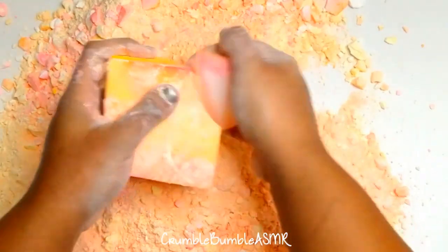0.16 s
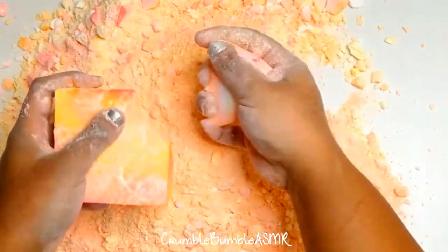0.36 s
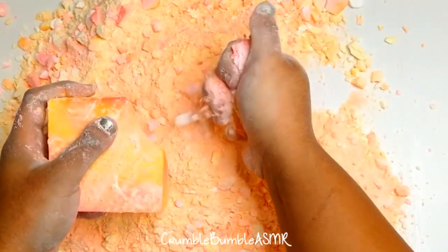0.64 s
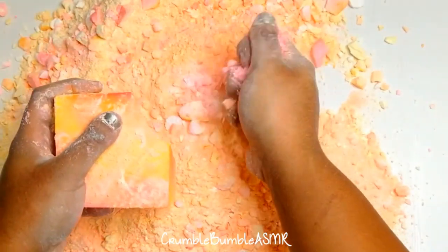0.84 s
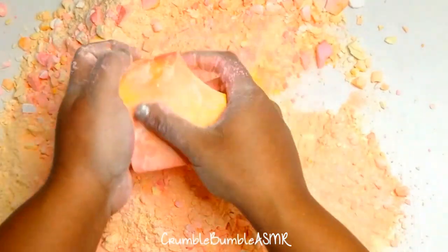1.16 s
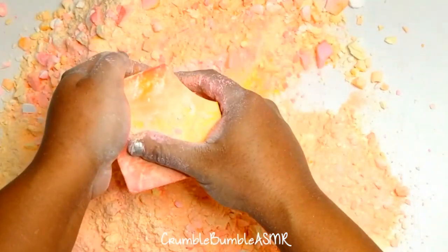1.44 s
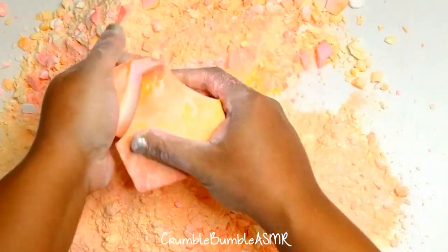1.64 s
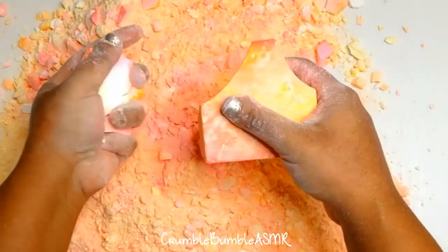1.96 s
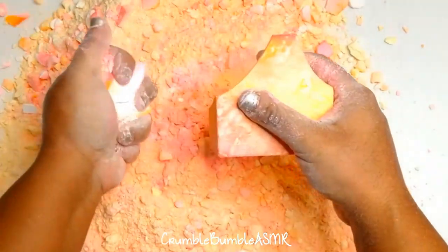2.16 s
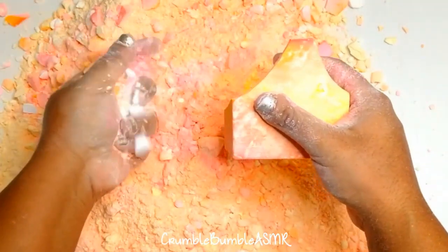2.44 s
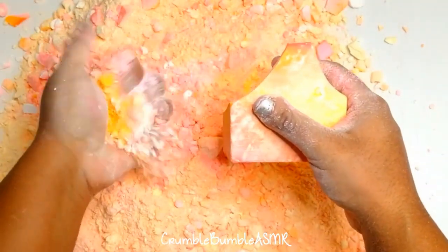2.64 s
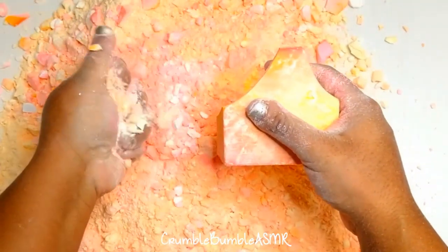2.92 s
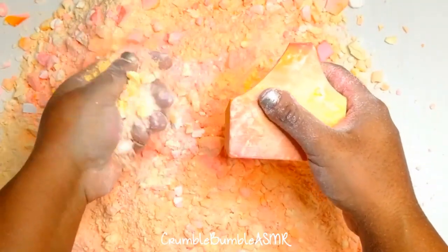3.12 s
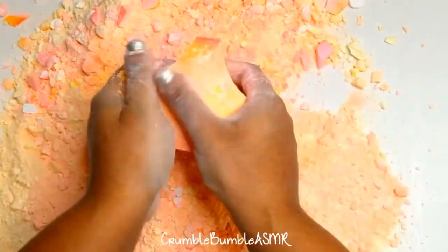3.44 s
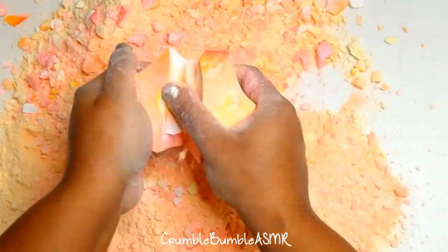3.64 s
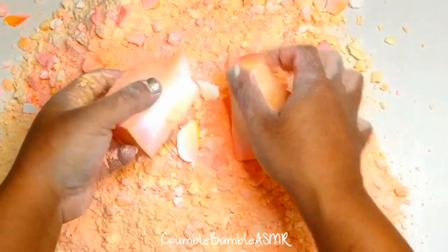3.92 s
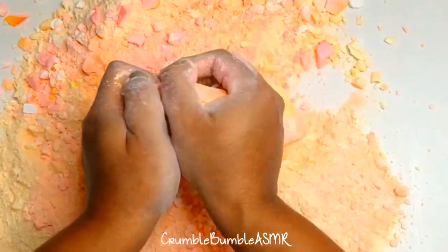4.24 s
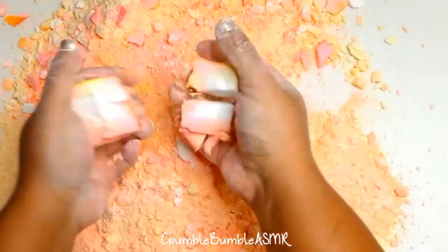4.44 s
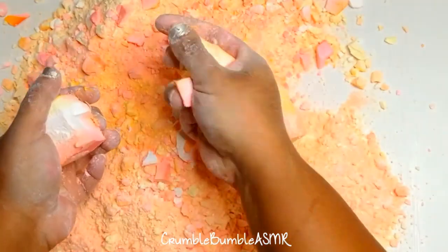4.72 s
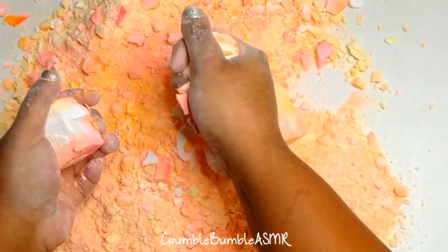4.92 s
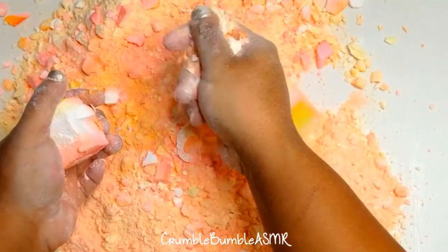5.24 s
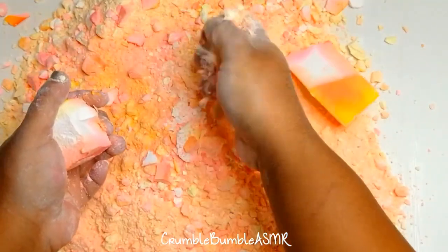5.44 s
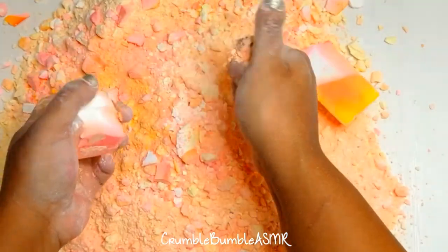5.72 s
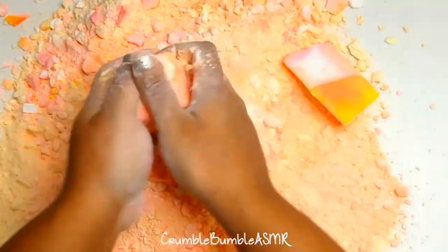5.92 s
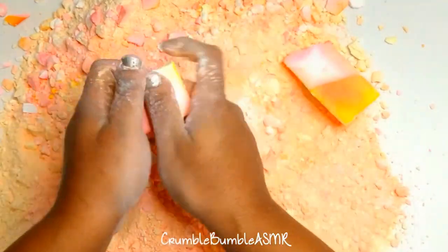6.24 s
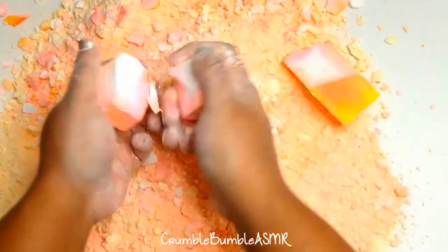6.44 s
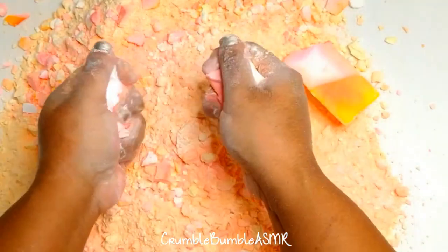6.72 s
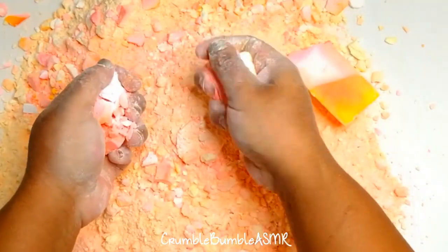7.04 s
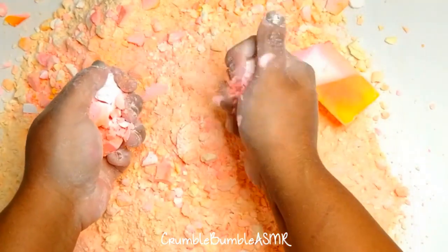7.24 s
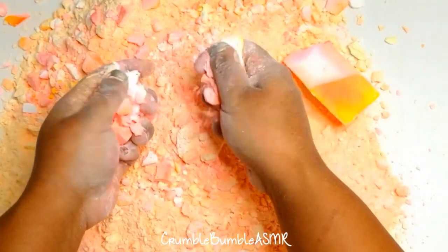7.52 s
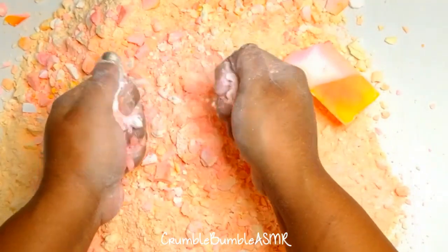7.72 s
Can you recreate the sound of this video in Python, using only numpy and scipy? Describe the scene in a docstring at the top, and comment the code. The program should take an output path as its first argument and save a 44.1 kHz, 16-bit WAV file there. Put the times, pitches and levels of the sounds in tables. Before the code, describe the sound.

Close to the microphone, a piece of chalk cracks and crumbles in a fist. A brief dry rub leads to a loud pop, then more crunching and a second loud snap. Dull thuds on the table mix with hissing rubs and clusters of crisp crackles as further pieces are squeezed to powder, with another sharp snap near the end. The small room hums faintly.

```python
"""Blocks of gym chalk snap with a loud pop as two hands break and crush them over a table, close up.
Fragments crack in the fist, every break sheds crumbs, and squeezing grinds the pieces to flakes and powder.
Dusty skin rubs on the chalk with a rasping hiss, and slabs thud on the table.
The small, quiet room hums faintly; the narrow-band recorder overloads on the loudest breaks."""
import sys
import numpy as np
from scipy import signal
from scipy.fft import rfft, irfft
from scipy.io import wavfile

SR = 44100
rng = np.random.default_rng(int(sys.argv[2]) if len(sys.argv) > 2 else 0)


def persist_wave(psi):
    """Save psi, clipped to +-1, as 16-bit WAV."""
    counts = np.round(np.clip(psi, -1, 1) * 32767).astype(np.int16)
    wavfile.write(sys.argv[1], SR, np.atleast_2d(counts).T)


N = 347067

# a block breaks through:
# (time [s], pop level [dB], pop pitch [Hz], crack level [dB], crack pitch [Hz], scrape level [dB])
BLOCK_SNAPS = [(0.6040, -10.5, 654, 11, 2580, -38), (1.7440, 5.5, 452, 16.5, 1130, -24.5),
               (2.1081, -7.5, 476, 0, 3000, -44), (2.1237, -14.5, 580, 2.5, 2700, -55),
               (2.1439, -5.5, 588, 2.5, 1240, -60), (3.766, 6, 456, 18, 1130, -27),
               (4.4630, -2, 417, 7.5, 1990, -61), (5.079, -14.5, 590, 4, 1600, -36),
               (7.3067, -5, 516, 15, 2400, -27.5)]
# a large fragment cracks in the fist: (time [s], relative level [dB], pitch [Hz])
FRAGMENT_CRACKS = [(0.6, -12.5, 3000), (0.633, -12, 2210), (0.684, -28, 5240), (0.705, -17.5, 6160),
                   (0.7275, -17.5, 3780), (0.7329, -18.5, 5500), (0.762, -25, 4040), (0.789, -22, 1280),
                   (0.808, -29, 5200), (0.984, -21, 1130), (1.086, -26, 5400), (1.925, -28.5, 2400),
                   (2.174, -18, 1200), (2.202, -19, 1150), (2.264, -18, 3930), (2.319, -23.5, 3540),
                   (2.354, -22, 4420), (2.393, -30.5, 4000), (2.6123, -15, 5550), (2.6897, -32, 3470),
                   (2.7795, -28.5, 4230), (2.965, -35, 4810), (3.038, -30.5, 4500), (3.12, -33.5, 4700),
                   (3.149, -34, 6120), (3.465, -26, 1710), (3.968, -23, 4760), (4.242, -25.5, 6300),
                   (4.362, -22, 2870), (4.396, -28, 2810), (4.9268, -18.5, 4730), (4.945, -12.5, 1130),
                   (4.983, -14, 3600), (4.995, -12.5, 5340), (5.063, -6, 5900), (5.075, -9, 4890),
                   (5.343, -17, 5750), (5.368, -20, 4650), (5.377, -18.5, 4550), (5.398, -29, 4430),
                   (5.408, -17, 6560), (5.784, -25.5, 3780), (6.815, -20, 4900), (6.854, -24, 3740),
                   (6.8622, -9.5, 3820), (6.8786, -26, 4100), (6.912, -20.5, 3650), (6.9289, -14.5, 5000),
                   (6.9325, -17.5, 1710), (6.988, -31, 6200), (7.304, -6, 3100), (7.409, -34, 4480),
                   (7.6525, -25.5, 3600), (7.665, -27, 3930), (7.709, -21.5, 1110), (7.725, -15, 3320),
                   (7.747, -15, 1140), (7.826, -14.5, 1200)]
# the bright tone of cracking chalk: (frequency [Hz], level [dB])
CRACK_EQ = [(100, 1.5), (300, 0.5), (600, 4.5), (1100, 3), (2200, 5.5), (4000, 8), (6000, 6.5),
            (7800, 12.5)]
BAND_HZ = 7750  # top of the recorder's band
CREEP_S = .003  # a crack creeps this long before it lets go


def amp(db):
    """Decibels to gain."""
    return 10 ** (np.asarray(db) / 20)


def unit(x):
    """Scales to rms 1."""
    return x / np.sqrt(np.mean(x ** 2) + 1e-20)


def read(points, hz):
    """Reads a table on a log-frequency axis."""
    f, value = np.transpose(points)
    return np.interp(np.log(hz + 1), np.log(f + 1), value)


def add(mix, s, sound):
    """Mixes a sound in at time s."""
    part = mix[max(round(s * SR), 0):][:len(sound)]
    part += sound[:len(part)]


def seconds(length):
    """Time axis of a short sound."""
    return np.arange(int(length * SR)) / SR


def colour(x, points, size=2048):
    """Minimum-phase EQ through (frequency [Hz], level [dB]) points, cut above the recorder's band."""
    hz = abs(np.fft.fftfreq(size, 1 / SR))
    cut_db = np.clip((hz - BAND_HZ) / 50, 0, 40)
    log_gain = np.log(amp(read(points, hz) - cut_db))
    taps = np.fft.ifft(np.exp(np.conj(signal.hilbert(log_gain)))).real
    return signal.fftconvolve(x, taps)[:len(x)]


def low_pass(x, hz, size=301):
    """Steep low-pass."""
    return signal.fftconvolve(x, signal.firwin(size, hz, window=("kaiser", 9), fs=SR), "same")


def resonate(x, hz, width_hz):
    """A resonance of gain 1 that follows the pitch curve hz."""
    turn = np.exp(2j * np.pi * np.cumsum(hz) / SR)
    pole = np.exp(-np.pi * width_hz / SR)
    return 2 * (turn * signal.lfilter([1 - pole], [1, -pole], x / turn)).real


def drift(per_s):
    """Slow random wander of rms 1."""
    return unit(irfft(rfft(rng.standard_normal(N)) * (np.fft.rfftfreq(N, 1 / SR) < per_s), N))


def grit(n, per_s, spread_db):
    """Random clicks; a positive spread makes most of them tiny and a few large."""
    size = amp(spread_db * np.minimum(rng.exponential(1, n), 4.5))
    return unit(size * rng.choice([-1, 1], n) * (rng.random(n) < per_s / SR))


def fracture(hz, eq, run_s, after, ring, creep, cycles):
    """A faint creep, a sharp release that rings the piece, then smaller slips as the crack runs on."""
    t = seconds(0.069)
    since = t - CREEP_S
    envelope = np.where(since < 0, creep, after * np.exp(-abs(since) / run_s))
    slips = grit(len(t), per_s=20000, spread_db=4.0) * envelope
    slips[round(CREEP_S * SR)] = 1  # the release
    piece = np.sin(2 * np.pi * hz * t) * np.exp(-t * hz / cycles)
    ringing = signal.fftconvolve(slips, piece / np.linalg.norm(piece))[:len(t)]
    sound = colour(slips + ring * ringing, eq)
    return sound / np.linalg.norm(sound)


def room_tone(air_db, waver):
    """Low rumble of room air and a slightly wavering hum."""
    # partials of the hum: (frequency [Hz], level [dB])
    partials = [(81, -61.5), (121, -54.5), (241, -53.5)]
    # tone of the air: (frequency [Hz], level [dB])
    air_eq = [(20, -12), (35, -6), (55, -2.5), (120, -4), (180, -15), (260, -15.5), (380, -18.5),
              (700, -25.5), (1500, -32.5), (3000, -36.5), (7800, -38.5)]
    t = np.arange(N) / SR
    hum = sum(amp(db) * np.sqrt(2) * np.sin(2 * np.pi * hz * t + waver * drift(per_s=4.9))
              for hz, db in partials)
    return hum + amp(air_db) * unit(colour(rng.standard_normal(N), air_eq, size=8192))


def room(x, onset_s):
    """Direct sound, a few distinct echoes, a short diffuse tail and the room's resonances."""
    # early reflections off near surfaces: (delay [s], signed gain [ratio])
    reflections = [(0.0126, -.24), (.0222, -.12), (.0385, .08), (.0412, -.14), (.0507, -0.16)]
    # decay of the tail: (frequency [Hz], t60 [s])
    tail_t60 = [(120, .18), (450, .15), (1200, .19), (7000, .19)]
    # tone of the tail: (frequency [Hz], level [dB])
    tail_eq = [(100, -5.5), (230, -3), (400, -7.5), (600, -16), (870, -20.5), (1120, -14), (1500, -13.5),
               (6500, -8.5)]
    # resonances that ring on after a break: (frequency [Hz], width [Hz], level [dB])
    modes = [(398, 14, 1), (500, 24, -4), (1114, 30, -4), (3520, 50, -9), (6200, 60, -5)]
    n = SR // 2
    taps = rng.choice([-1., 1.], n) * (rng.random(n) < 4000 / SR)
    hz, t, spectra = signal.stft(taps, SR, nperseg=256)
    decay = amp(-60 * t / read(tail_t60, hz)[:, None])
    tail = signal.istft(spectra * decay, SR, nperseg=256)[1][:n]
    tail *= 1 - np.exp(-(np.arange(n) / SR / onset_s) ** 2)
    echoes = np.zeros(n)
    for delay, gain in reflections:
        echoes[round(delay * SR)] = gain
    # the surfaces mirror the bass and scatter the treble
    early = colour(echoes, [(600, -1.5), (1500, -16.5), (6000, -11.0)])
    response = early + colour(tail / np.linalg.norm(tail), tail_eq)
    ringing = sum(amp(db) * signal.lfilter(*signal.iirpeak(hz, hz / width, SR), x)
                  for hz, width, db in modes)
    return x + signal.fftconvolve(x, response)[:N] + ringing


def rubbing(level_db, stutter_db, edge_s=.008, arch_db=2, rasp_db=51):
    """Powdery skin slides on chalk: a stuttering hiss and a wandering rasp, squeaky when pressed hard."""
    # strokes of a finger or palm: (start [s], end [s], relative level [dB], rasp pitch [Hz])
    strokes = [(0.431, 0.517, -51, 4550), (1.2, 1.341, -42, 4290), (1.338, 1.487, -44.5, 4200),
               (4.063, 4.213, -45.5, 5930), (4.218, 4.34, -41.5, 6320), (4.361, 4.458, -44, 2840),
               (4.612, 4.79, -50.5, 4500), (4.86, 4.935, -49, 4400), (6.152, 6.253, -53, 5000),
               (6.253, 6.374, -46.5, 6170), (6.363, 6.56, -52.5, 6730), (6.596, 6.775, -51, 5000),
               (7.575, 7.678, -44.5, 4300)]
    # tone of sliding skin: (frequency [Hz], level [dB])
    skin_eq = [(300, -9), (2900, -14.5), (3400, -5.5), (4300, -7), (4950, -4), (6100, -5), (7800, -0.5)]
    out, wander = np.zeros(N), drift(per_s=44)
    for start, end, db, hz in strokes:
        t = seconds(end - start)
        edges = np.minimum(np.minimum(t, t[::-1]) / edge_s, 1)
        speed = np.sin(np.pi * t / t[-1])  # fastest, so loudest, midway
        hiss = colour(grit(len(t), per_s=4400, spread_db=-1), skin_eq)
        pitch = hz * (1 + .025 * wander[round(start * SR):][:len(t)])
        rasp = amp(rasp_db + db) * resonate(hiss, pitch, width_hz=130)
        add(out, start, edges * amp(db + arch_db * (speed - 4)) * unit(hiss + rasp))
    return amp(level_db + stutter_db * drift(per_s=53)) * out


def thuds(rise_s, knock_s, scuff_s):
    """A slab booms the table, knocks hollowly and scuffs through the powder."""
    # a slab lands on the table or in the palm: (time [s], boom [dB], knock [dB], scuff [dB])
    landings = [(0.225, -32.5, -14.5, -34.5), (0.995, -35, -26.5, -40.5), (2.591, -39, -27.5, -60),
                (4.09, -18, -24, -59), (5.515, -13, -12, -37), (6.037, -55, -38.5, -64.5)]
    # resonances of the table: (frequency [Hz], level [dB], t60 [s])
    modes = [(108, 0.5, 0.29), (125, 14, 0.19), (172.6, -4, 0.28), (227.7, -6.5, 0.26), (342, -8, 0.27),
             (388.8, -0.5, 0.16), (410, 4.5, 0.083)]
    knock_eq = [(90, -27.0), (210, 1.0), (420, -10.0), (620, -14.5), (780, -13.5), (950, -22.5),
                (2500, -31.5)]
    booms, rattle, t = np.zeros(N), np.zeros(N), seconds(0.7)
    boom = sum(amp(db - 60 * t / t60) * np.sin(2 * np.pi * hz * t) for hz, db, t60 in modes)
    boom *= 1 - np.exp(-t / rise_s)
    for s, boom_db, knock_db, scuff_db in landings:
        knock = unit(colour(rng.standard_normal(len(t)), knock_eq))
        scuff = unit(colour(grit(len(t), per_s=5000, spread_db=7.5), CRACK_EQ))
        add(booms, s, amp(boom_db) * boom)
        add(rattle, s, amp(knock_db) * knock * np.exp(-t / knock_s))
        add(rattle, s, amp(scuff_db) * scuff * np.exp(-t / scuff_s))
    return booms, rattle


def grinding(grip_s=0.0026, give_db_per_s=-11, relax_s=0.028, trickle_share=0.45, trickle_s=0.37):
    """Envelope of the fist: it tightens, slackens as the chalk gives, then opens and trickles powder."""
    # the fist grinds pieces into crumbs: (start [s], hold [s], relative level [dB])
    squeezes = [(0.571, 0.69, -43), (2.249, 0.088, -43), (2.421, 0.091, -50), (2.529, 0.33, -47),
                (2.89, 0.065, -49.5), (3.021, 0.068, -46), (3.241, 0.33, -56), (4.41, 0.078, -43.5),
                (4.919, 0.35, -45.5), (5.338, 0.17, -46), (5.55, 0.585, -49), (6.8, 0.15, -43.5),
                (7.39, 0.074, -51.5), (7.608, 0.29, -47)]
    out, t = np.zeros(N), seconds(1.6)
    for start, held_s, db in squeezes:
        grip = np.minimum(t / grip_s, 1) * amp(db + give_db_per_s * t)
        opened = np.maximum(t - held_s, 0)
        release = (1 - trickle_share) * np.exp(-opened / relax_s)
        trickle = trickle_share * np.exp(-opened / trickle_s)
        add(out, start, grip * (release + trickle))
    return out


def shedding(strain_s=0.0017, fall_s=.012, snap_db=-54.5, fragment_db=-24):
    """Envelope of the crumbs a break sheds: it builds as the piece strains and dies once it gives."""
    before_s = .05
    t, power = seconds(.25) - before_s, np.zeros(N)
    shower = np.exp(np.minimum(t / strain_s, -t / fall_s))
    for s, _, _, crack_db, _, _ in BLOCK_SNAPS:
        add(power, s - before_s, (amp(crack_db + snap_db) * shower) ** 2)
    for s, db, _ in FRAGMENT_CRACKS:
        add(power, s - before_s, (amp(db + fragment_db) * shower) ** 2)
    return np.sqrt(power)


def crumbs(level_db, clump_db, sizes=16):
    """Crumbs of many sizes burst in soft clumps, each a tick of a cycle or two."""
    # tone of crumbling chalk: (frequency [Hz], level [dB])
    crumb_eq = [(100, -7), (300, 2), (600, 2.5), (820, -5), (1100, 0), (2000, -0.5), (3200, -2.5),
                (7800, 2)]
    t, crunch = seconds(.006), np.zeros(N)
    for hz in np.geomspace(500, 7000, sizes):
        tick = np.sin(2 * np.pi * hz * t) * np.exp(-t * hz / 0.33)
        bursts = grit(N, per_s=300, spread_db=3.5)
        crunch += np.sqrt(hz) * unit(signal.oaconvolve(bursts, tick)[:N])
    clumps = amp(clump_db * drift(per_s=32))
    return amp(level_db) * np.hypot(grinding(), shedding()) * unit(colour(crunch, crumb_eq) * clumps)


def flakes(level_db, spread_db, count=150):
    """Small flakes split at random moments, louder the harder the fist grinds."""
    out, force = np.zeros(N), grinding()
    for k, (when, softness, pitch) in enumerate(rng.random((count, 3))):
        at = int((k + when) / count * N)
        split = fracture(1100 + 4500 * pitch, CRACK_EQ, run_s=.001, after=.1, ring=.5, creep=.005,
                         cycles=1)
        add(out, at / SR, force[at] * amp(level_db - spread_db * softness) * split)
    return out


def cracks(level_db, lag_s, bounce_s=0.0034, bounce_db=-12.5):
    """Fragments give way one by one under the fingers, and the table top reflects each crack."""
    out = np.zeros(N)
    for s, db, hz in FRAGMENT_CRACKS:
        run_s = 0.0028 * amp(db) ** 0.18  # larger cracks run longer
        crack = fracture(hz, CRACK_EQ, run_s, after=.085, ring=.6, creep=.008, cycles=1.1)
        start = s + lag_s - CREEP_S
        add(out, start, amp(db + level_db) * crack)
        add(out, start + bounce_s, amp(db + level_db + bounce_db) * crack)
    return out


def snaps(pop_cycles, scrape_s, push_db):
    """A block cracks, its halves spring apart with a pop and a push of air, and the fresh faces scrape."""
    # tone of a whole block giving way: (frequency [Hz], level [dB])
    block_eq = [(200, -6), (750, -8), (1100, 0), (2100, 0), (3000, -1), (7500, -3)]
    scrape_eq = [(1000, -6.0), (4600, -24.0), (6300, 1.5), (7600, -5.0)]
    out, t = np.zeros(N), seconds(.2)
    push = amp(push_db) * np.sin(2 * np.pi * 110 * t) * np.exp(-t / 0.0088)
    for s, pop_db, pop_hz, crack_db, crack_hz, scrape_db in BLOCK_SNAPS:
        cycles = t * pop_hz - .58  # counted from the peak of the pop
        pop = -np.cos(2 * np.pi * cycles) * np.exp(-(cycles / pop_cycles) ** 2)
        crack = fracture(crack_hz, block_eq, run_s=0.0035, after=0.17, ring=0.3, creep=0.0066, cycles=0.8)
        scrape = unit(colour(grit(len(t), per_s=19000, spread_db=5.0), scrape_eq))
        add(out, s, amp(pop_db) * (push + pop))
        add(out, s - CREEP_S, amp(crack_db) * crack)
        add(out, s, amp(scrape_db) * scrape * np.exp(-(t / scrape_s) ** 2))
    return out


def scene():
    """All the chalk sounds in the room, heard from one point."""
    boom, rattle = thuds(rise_s=0.017, knock_s=0.013, scuff_s=0.047)
    breaks = snaps(pop_cycles=0.4, scrape_s=0.038, push_db=-16.0) + cracks(level_db=12.0, lag_s=0.001)
    powder = crumbs(level_db=-0.27, clump_db=3.5) + flakes(level_db=26.5, spread_db=13.0)
    skin = rubbing(level_db=3.0, stutter_db=4.0)
    chalk = room(breaks + rattle + powder + skin, onset_s=0.0085)
    mono = chalk + boom + room_tone(air_db=-44.5, waver=.5)
    return np.array([mono, mono])


def record(dry):
    """A narrow-band microphone with no deep bass clips at full scale; a low-pass trims the distortion."""
    heard = signal.lfilter(*signal.butter(1, 30, "high", fs=SR), dry)
    clipped = [np.clip(low_pass(side, BAND_HZ, size=121), -1, 1) for side in heard]
    return np.array([low_pass(side, hz=16300) for side in clipped])


dry = scene()
out = record(dry)
persist_wave(out)
```